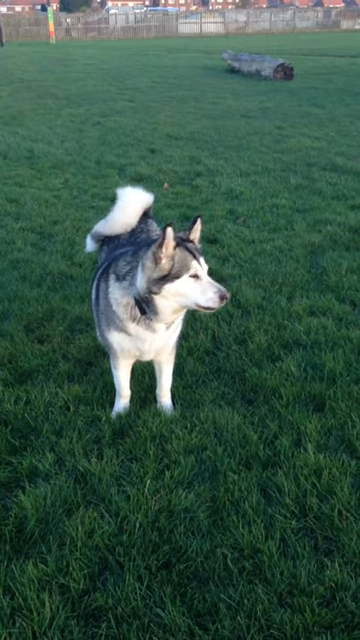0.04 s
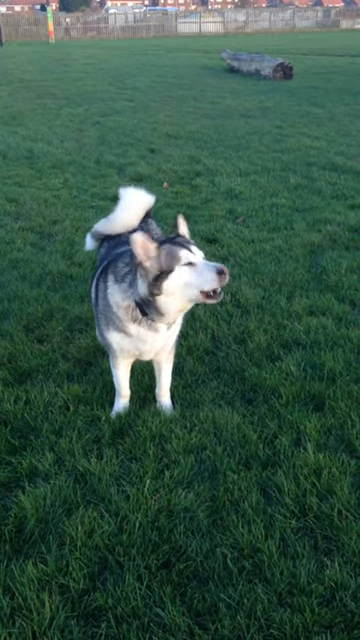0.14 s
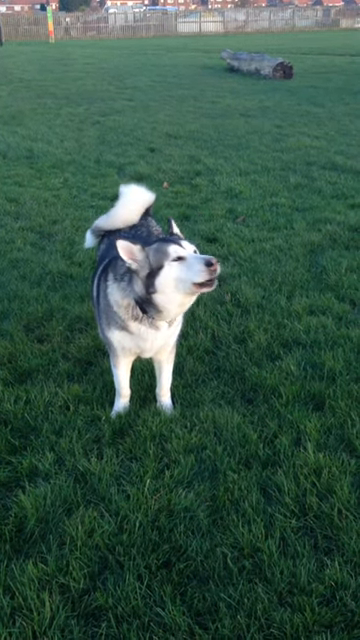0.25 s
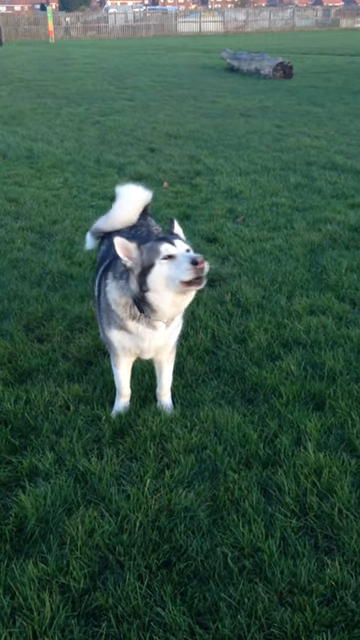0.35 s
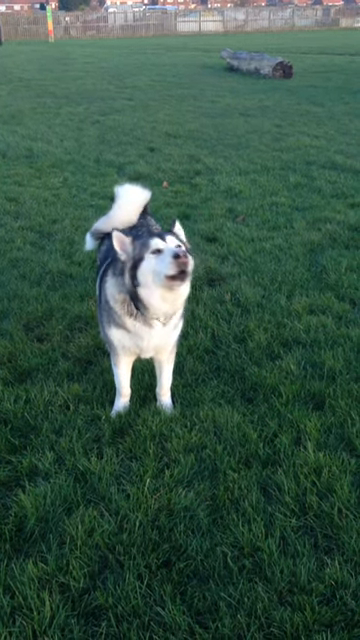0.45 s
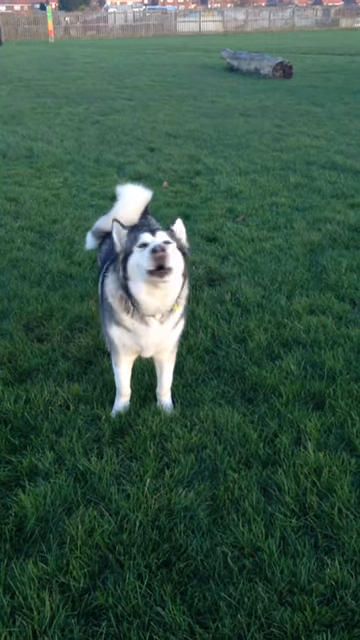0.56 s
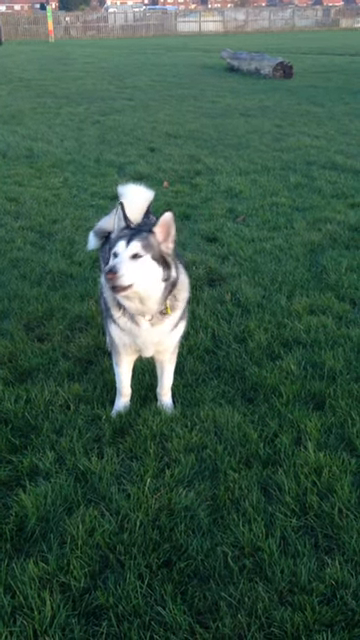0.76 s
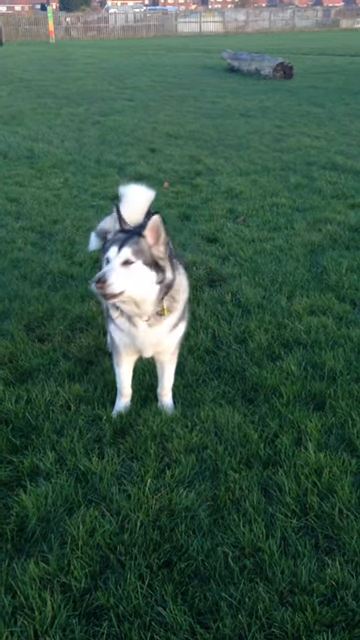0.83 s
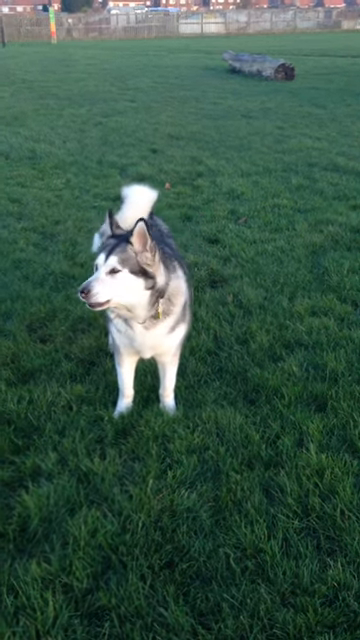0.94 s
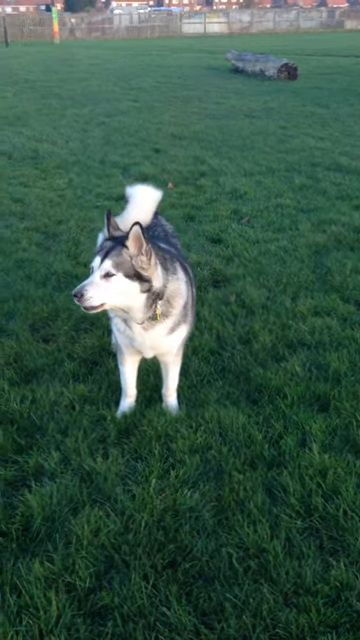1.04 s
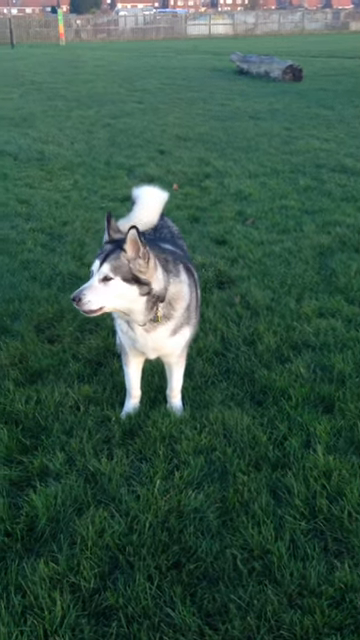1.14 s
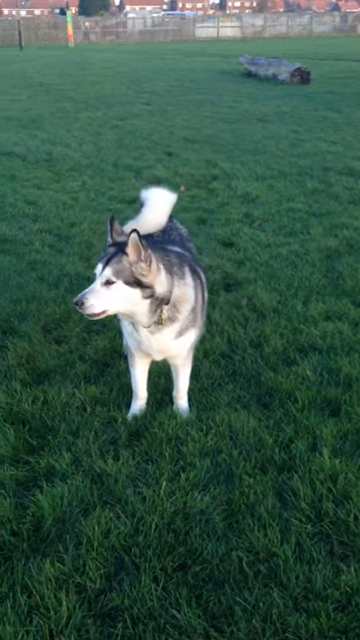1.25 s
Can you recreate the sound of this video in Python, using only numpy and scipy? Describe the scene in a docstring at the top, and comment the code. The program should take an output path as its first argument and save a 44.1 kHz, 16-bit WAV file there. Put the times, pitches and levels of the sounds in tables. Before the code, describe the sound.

A large dog gives one short howl a few steps away on open grass: a loud, raspy woof, a thinner held note, a downward slide and a faint creaky growl, over a low distant town hum.

```python
"""The low hum and wash of a distant town is heard first: steady coloured noise.
Then, a few steps away on an open grass field, a dog gives one short howl: a loud, raspy woof thins
to a pure held note and slides down. It is a sum of harmonics with noise pulsed by the vocal folds.
A faint creaky growl ends it: irregular pulses ring damped resonances. Decaying noise adds scatter."""
import sys
import numpy as np
from scipy import signal
from scipy.fft import rfft, irfft
from scipy.io import wavfile

SR = 44100
rng = np.random.default_rng(int(sys.argv[2]) if len(sys.argv) > 2 else 0)


def log_audio(samples):
    """Write samples as a 16-bit WAV file to the path given in sys.argv[1]."""
    # one column per channel
    frames = np.atleast_2d(samples).T
    # limit to full scale, then quantise
    limited = np.clip(frames, -1, 1)
    pcm = np.round(limited * 32767).astype(np.int16)
    wavfile.write(sys.argv[1], SR, pcm)


N = 57330
T = np.arange(N) / SR  # t/s

# Spectrum of the distant town: f/Hz, relative level/dB per Hz
TOWN_SPECTRUM = [(15, -23), (35, -17.5), (48, -6), (62, 1), (110, -2), (160, -7), (220, -14.5),
                 (320, -26.5), (480, -13.5), (820, -13), (1100, -17.5), (1600, -22.5), (2050, -30),
                 (2800, -35), (8000, -37), (15000, -39)]
TOWN_DB = -52

# Spectra of three bursts of air, from dull to bright: f/Hz, relative level/dB per Hz
PUFF_SPECTRUM = [(80, -27), (250, -22), (400, 2.5), (550, -10), (900, -24.5), (2000, -40.5), (16000, -79.5)]
RASP_SPECTRUM = [(80, -40.5), (230, -24.5), (380, 0), (560, 3.5), (850, -7.5), (1200, -17.5), (1600, -18),
                 (2200, -26.5), (3000, -43), (4000, -51), (16000, -81.5)]
HISS_SPECTRUM = [(2000, -38), (4000, -21.5), (5200, -17.5), (5800, 5), (6400, -14), (8000, -19),
                 (9500, -27.5), (15000, -31)]
PUFF_AT_S, RASP_AT_S, HISS_AT_S = 0.174, 0.193, 0.223  # peak times
# Swell of each burst: peak level/dB, rise/(dB per s), fall/(dB per s)
PUFF_SWELL = (-34.5, 4200, 173)
RASP_SWELL = (-26.5, 2000, 234)
HISS_SWELL = (-46, 810, 540)

FIELD_DB, FIELD_T60_S = -36, 0.8  # scatter relative to the dog; time to decay by 60 dB

# Course of the howl: t/s, pitch f/Hz, first harmonic level/dB, second harmonic level/dB
HOWL = [(0.2, 311.1, -33, -34.5), (0.204, 323.3, -22.5, -31), (0.224, 377.4, -6, -21.5),
        (0.232, 390, -5, -15.5), (0.25, 387.5, -5, -16), (0.258, 379.6, -9, -27.5),
        (0.262, 357, -12, -43.5), (0.274, 340, -14.5, -24), (0.31, 341.6, -18.5, -39.5),
        (0.33, 388.4, -27, -36), (0.376, 396, -32.5, -44), (0.47, 364.1, -25.5, -39.5),
        (0.582, 360.7, -28.5, -39.5), (0.662, 333.8, -28.5, -45.5), (0.714, 329.8, -27, -42),
        (0.75, 335.5, -28.5, -38.5), (0.784, 302, -42, -42), (0.824, 274.5, -45, -33.5),
        (0.922, 227.8, -53.5, -41.5), (0.94, 201.0, -56, -40)]
ATTACK_S, RELEASE_S, SCOOP_HZ_PER_S = 0.019, 0.0065, 2900  # the voice scoops up into the woof
JITTER, JITTER_HZ = 0.00083, 144  # rms fraction of the pitch, and its fastest motion
ONSET_JITTER, SETTLE_S = 0.049, 0.012  # extra jitter, dying away as the folds settle
BREAK_JITTER, BREAK_S = 0.011, 0.0059  # extra jitter as the voice cracks
SHIMMER_DB, SHIMMER_HZ = 0.44, 70  # rms wavering of the voice level

# Overtones of the woof, before the trims below: t/s, third harmonic level/dB,
# middle overtones level/dB, treble level/dB
OVERTONES = [(0.184, -47, -59.5, -62), (0.204, -28, -42, -57), (0.224, -24.5, -32.5, -47.5),
             (0.25, -54.5, -43.5, -43.5), (0.264, -32, -34, -62), (0.278, -41.5, -39, -52),
             (0.3, -64.5, -39.5, -56), (0.35, -63, -75.5, -83.5)]
THIRD_TRIM_DB, MIDDLE_TRIM_DB, TREBLE_TRIM_DB = -1, -2, -1.5
TREBLE_HZ = 4150  # the middle overtones pass into the treble here
# Throat and mouth resonance: f/Hz, relative gain/dB when open, relative gain/dB when narrowed
THROAT = [(1200, 9, 0.5), (1550, 4.5, -4), (1750, 2.5, 2.5), (2050, -5.5, -12.5), (2350, -1, -16),
          (2700, -18, 1.5), (3080, -21.5, -15), (3355, -26.5, -1), (3800, -35, -24.5), (4540, -19.5, -25),
          (4650, -1, -23.5), (5250, -5, -26.5), (5500, -13, -14.5), (5850, -12, -26), (6200, -14, -20.5),
          (6570, 1, -6), (7000, -14.5, -29.5), (7400, -10.5, -29.5), (8100, -18.5, -22.5),
          (10000, -42, -43)]
NARROW_AT_S, NARROW_S = 0.273, 0.023  # midpoint and duration of the narrowing
DISPERSION = 0.49  # radians: the throat delays high overtones and smears each pulse
FLUTTER_DB, FLUTTER_HZ = 4.5, 45.5  # each overtone wavers on its own

# Brief flares of overtones in the held note and slide:
# t/s, half length to 1/e/s, harmonic number, level/dB
FLARES = [(0.354, 0.049, 4, -67), (.5, .03, 8, -71.5), (0.492, 0.051, 14, -72.5), (0.677, 0.021, 8, -63),
          (0.743, 0.021, 8, -71), (0.748, 0.066, 5, -67.5), (0.801, 0.019, 4, -60.5),
          (0.823, 0.026, 3, -48.5), (0.829, .018, 6, -62), (0.87, 0.043, 3, -56.5)]

# Course of the closing growl: t/s, pulse rate f/Hz, level/dB
GROWL = [(.945, 88, -44.5), (.975, 64, -47), (1.01, 56, -52.5), (1.1, 60, -53.5), (1.19, 50, -55.5),
         (1.265, 58.5, -53.5), (1.3, 60, -78)]
# Resonances of the nearly closed throat: f/Hz, bandwidth/Hz, relative level/dB
GROWL_MODES = [(411.6, 72, 7), (543, 54, -8), (940, 230, -25)]
GROWL_JITTER, GROWL_SCATTER_DB = 0.25, 3.5  # rms unevenness of log rate and of pulse level

EDGE_HZ = 15300  # upper band limit


def amp(db):
    """Decibel law: level to amplitude ratio."""
    return 10 ** (np.asarray(db) / 20)


def unit(x):
    """Normalisation: scale to unit root-mean-square value."""
    return x / np.sqrt(np.mean(x ** 2) + 1e-20)


def curves(table):
    """Linear interpolation in time of each column of a control table."""
    s, *columns = np.transpose(table)
    return [np.interp(T, s, column) for column in columns]


def response(table, hz, axis=1):
    """Frequency response: table gain interpolated in dB over log frequency."""
    columns = np.transpose(table)
    return amp(np.interp(np.log(hz + 1), np.log(columns[0]), columns[axis]))


def noise(spectrum):
    """Spectral shaping: white noise filtered to a given colour, at unit level."""
    gain = response(spectrum, np.fft.rfftfreq(N, 1 / SR))
    return unit(irfft(rfft(rng.standard_normal(N)) * gain, N))


def wander(hz):
    """Low-pass random process: a Gaussian filter leaves smooth motion of unit level."""
    lowpass = np.exp(-(np.fft.rfftfreq(N, 1 / SR) / hz) ** 2)
    return unit(irfft(rfft(rng.standard_normal(N)) * lowpass, N))


def swell(peak_s, db, rise, fall):
    """Exponential growth and decay: straight lines in dB on both sides of a peak."""
    return amp(db - np.maximum((peak_s - T) * rise, (T - peak_s) * fall))


def town():
    """Superposition of distant traffic and air: coloured noise of gently uneven level."""
    return noise(TOWN_SPECTRUM) * amp(TOWN_DB + 0.6 * wander(6))


def rushing_air(phase):
    """Turbulence modulated by the glottis: noise bursts pulse at the rate of the folds."""
    air = noise(PUFF_SPECTRUM) * swell(PUFF_AT_S, *PUFF_SWELL)
    air = air + noise(RASP_SPECTRUM) * swell(RASP_AT_S, *RASP_SWELL)
    air = air + noise(HISS_SPECTRUM) * swell(HISS_AT_S, *HISS_SWELL)
    return air * unit(1 + 0.26 * np.cos(phase))


def field(x):
    """Diffuse scattering from grass and far fence: convolution with dull, decaying noise."""
    dull = signal.lfilter(*signal.butter(2, 2000, fs=SR), rng.standard_normal(N))
    tail = dull * amp(-60 * T / FIELD_T60_S)
    return amp(FIELD_DB) * signal.fftconvolve(x, tail / np.linalg.norm(tail))[:N]


def folds(pitch):
    """Phase as the integral of frequency: the folds shake at the start and at the crack."""
    early_s = HOWL[0][0] - T
    shake = JITTER + ONSET_JITTER * np.exp(np.minimum(early_s, 0) / SETTLE_S)
    shake = shake + BREAK_JITTER * np.exp(-((T - NARROW_AT_S) / BREAK_S) ** 2)
    scooped = pitch - SCOOP_HZ_PER_S * np.maximum(early_s, 0)
    return 2 * np.pi * np.cumsum(scooped * (1 + shake * wander(JITTER_HZ))) / SR


def howl():
    """Harmonic series of a periodic source: two strong harmonics, overtones and pulsed air."""
    pitch, first_db, second_db = curves(HOWL)
    phase = folds(pitch)
    attack = np.clip((T - HOWL[0][0]) / ATTACK_S + 1, 0, 1)
    release = np.clip((HOWL[-1][0] - T) / RELEASE_S + 1, 0, 1)
    tone = -amp(first_db) * np.cos(phase) - amp(second_db) * np.cos(2 * phase)
    harmonics = tone + woof(pitch, phase) + flares(phase)
    shimmer = amp(SHIMMER_DB * wander(SHIMMER_HZ))
    # The root of two turns peak levels into rms levels
    voice = np.sqrt(2) * attack * release * harmonics * shimmer
    return voice + rushing_air(phase)


def woof(pitch, phase):
    """Source-filter principle: bright overtones shaped by a throat and mouth that narrow."""
    third_db, middle_db, treble_db = curves(OVERTONES)
    k = np.arange(4, 30)[:, None]  # harmonic numbers
    hz = k * pitch
    narrow = np.clip((T - NARROW_AT_S) / NARROW_S + 0.5, 0, 1)
    gains = (1 - narrow) * response(THROAT, hz, axis=1) + narrow * response(THROAT, hz, axis=2)
    gains = gains * amp(FLUTTER_DB * np.array([wander(FLUTTER_HZ) for _ in k]))
    treble = 0.5 + 0.5 * np.tanh(10 * np.log(hz / TREBLE_HZ))  # share of each overtone
    partials = np.cos(k * phase - DISPERSION * k ** 2)
    out = -amp(third_db + THIRD_TRIM_DB) * np.cos(3 * phase)
    bands = [(gains * (1 - treble), middle_db + MIDDLE_TRIM_DB),
             (gains * treble, treble_db + TREBLE_TRIM_DB)]
    for band, db in bands:
        # Dividing by the norm lets the level curve alone set the band's power
        out = out + amp(db) * (band * partials).sum(0) / np.linalg.norm(band, axis=0)
    return out * np.clip((OVERTONES[-1][0] - T) / RELEASE_S, 0, 1)


def flares(phase):
    """Amplitude modulation: single harmonics swell and fade under Gaussian envelopes."""
    out = np.zeros(N)
    for s, half_s, k, db in FLARES:
        envelope = np.exp(-((T - s) / half_s) ** 2)
        out = out + amp(db) * envelope * np.cos(round(k) * phase)
    return out


def growl():
    """Impulse excitation of resonators: slack folds flap unevenly and ring the throat."""
    rate, db = curves(GROWL)
    uneven_rate = rate * np.exp(GROWL_JITTER * wander(40))
    turns = np.cumsum(uneven_rate * (T >= GROWL[0][0])) / SR
    flaps = np.diff(np.ceil(turns), prepend=0)  # one impulse a turn
    flaps = flaps * amp(GROWL_SCATTER_DB * rng.standard_normal(N))
    t = T[:SR // 10]
    ring = np.zeros(len(t))
    for hz, width, level in GROWL_MODES:
        ring = ring + amp(level) * np.exp(-np.pi * width * t) * np.sin(2 * np.pi * hz * t)
    ring = ring * (1 - np.exp(-t / 0.0028))  # soft onset
    # The root evens out the power between fast and slow flapping
    pulses = flaps * amp(db) * np.sqrt(SR / rate)
    return signal.fftconvolve(pulses, ring / np.linalg.norm(ring))[:N]


def scene():
    """Superposition of the dog, its scatter from the field and the town."""
    dog = howl() + growl()
    return (dog + field(dog) + town())[None]


def record(dry):
    """Band limitation: a linear-phase low-pass filter removes the highest frequencies."""
    lowpass = signal.firwin(511, EDGE_HZ, window=("kaiser", 9), fs=SR)
    return signal.oaconvolve(dry, lowpass[None], "same")


dry = scene()
out = record(dry)
log_audio(out)
```